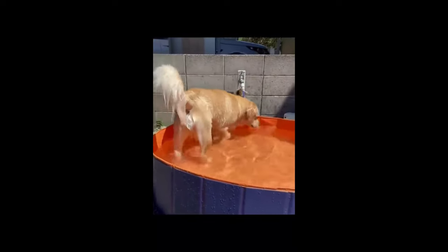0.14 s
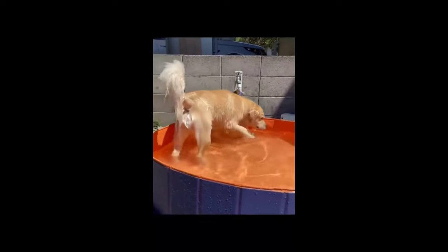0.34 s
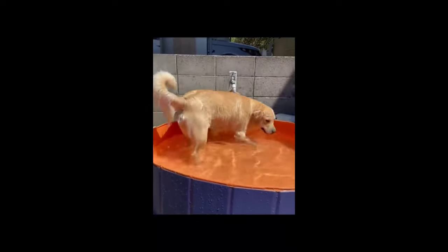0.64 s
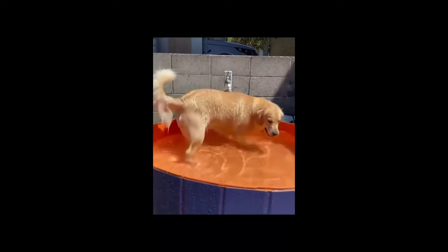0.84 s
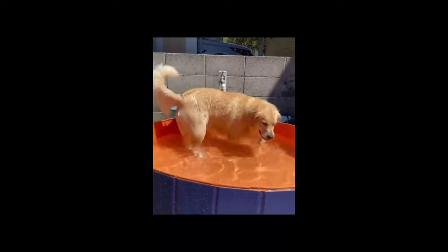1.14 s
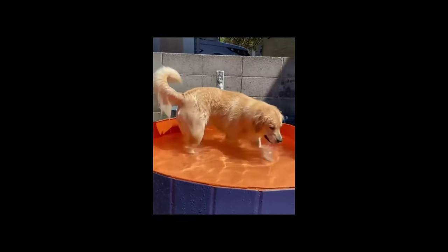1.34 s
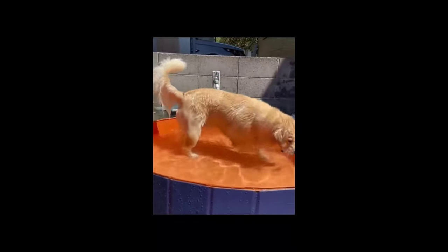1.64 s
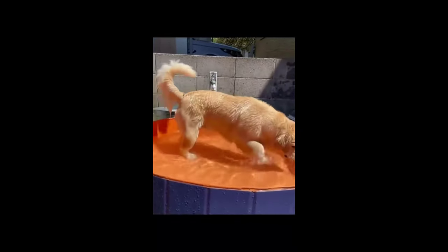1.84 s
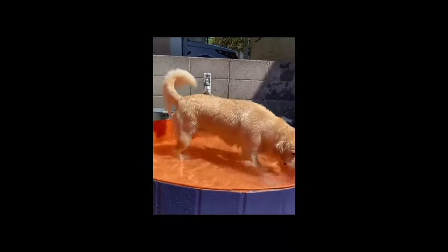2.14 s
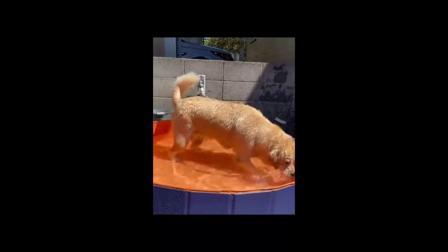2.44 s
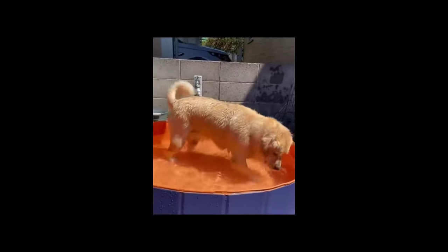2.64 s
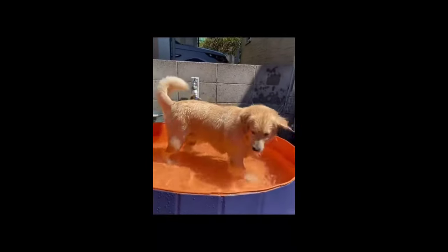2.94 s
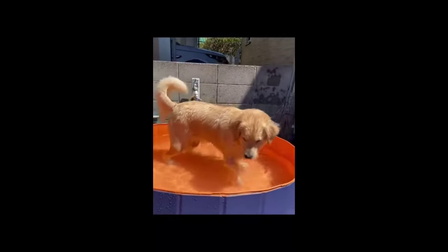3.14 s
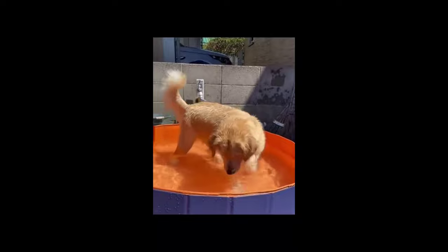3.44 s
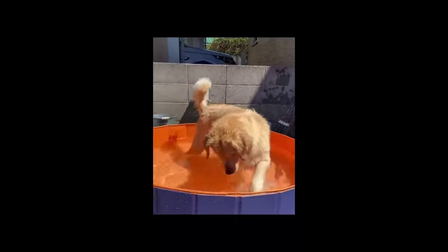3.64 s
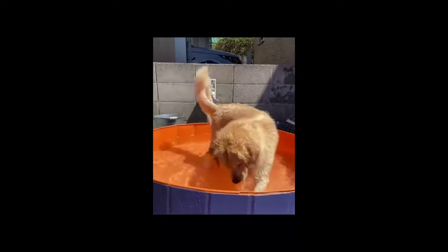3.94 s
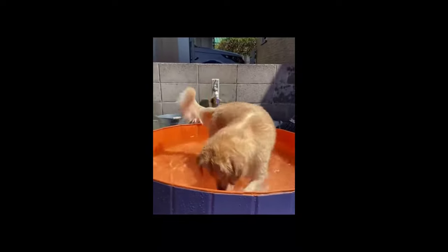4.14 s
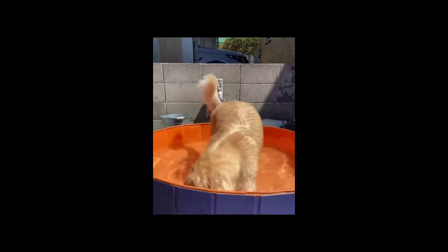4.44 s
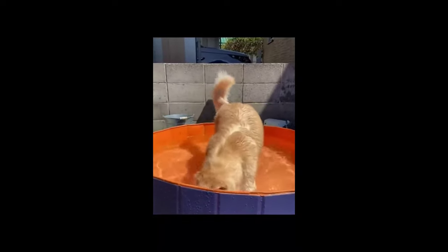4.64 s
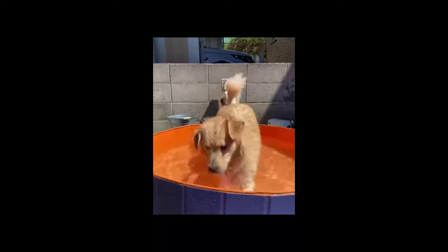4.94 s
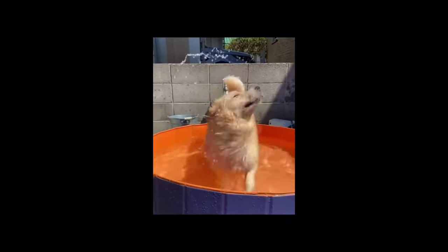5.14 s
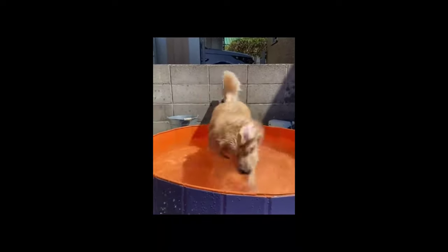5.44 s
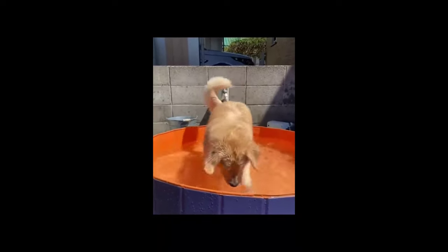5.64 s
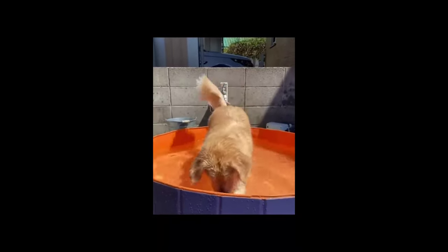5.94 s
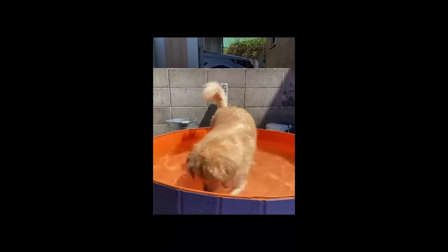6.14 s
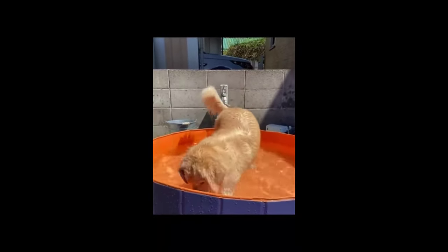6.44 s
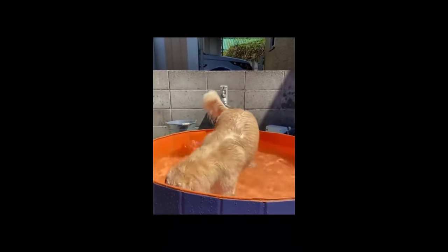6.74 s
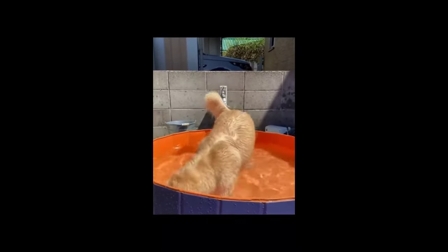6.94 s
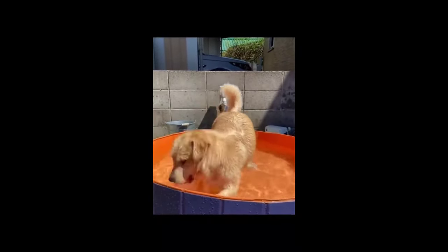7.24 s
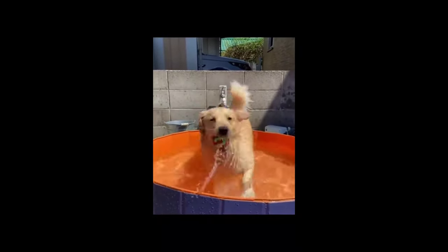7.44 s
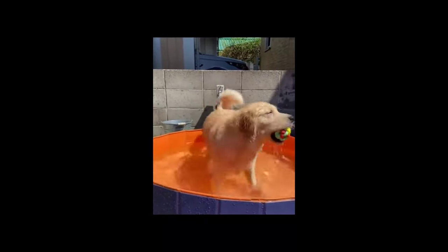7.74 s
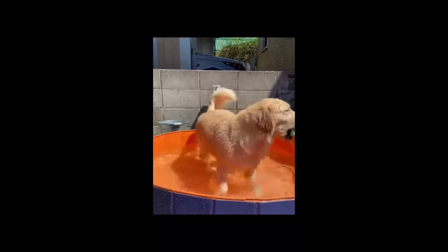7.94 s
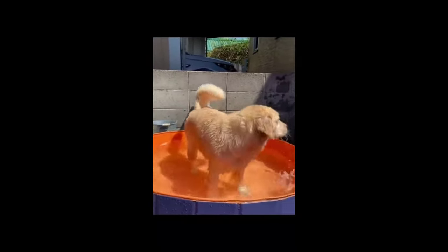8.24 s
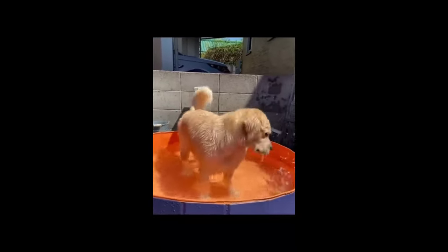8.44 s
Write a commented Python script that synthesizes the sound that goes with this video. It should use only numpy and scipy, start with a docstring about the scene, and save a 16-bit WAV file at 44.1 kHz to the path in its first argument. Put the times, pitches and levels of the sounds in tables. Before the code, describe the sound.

Close, wet pawing and muzzle-dunking in a shallow pool: bubbly sloshing, sharp slaps and dripping spray, with a low far-off engine behind.

```python
"""In a walled backyard, close by, a dog wades, paws and dunks its head in a shallow plastic pool.
Each stroke churns up a cloud of short ringing tones, one per bubble, and throws spray made of tiny rings and noise.
Big air pockets glug and hollows gloop as gliding tones; paws slap and drops fall back as noise bursts with rings.
Far off, traffic rumbles as shaped noise, an engine rises and falls and a hum wavers as slow tones."""
import sys
import numpy as np
from scipy import signal
from scipy.fft import rfft, irfft, next_fast_len
from scipy.io import wavfile
from scipy.ndimage import uniform_filter1d, map_coordinates

SR = 44100
rng = np.random.default_rng(int(sys.argv[2]) if len(sys.argv) > 2 else 0)


def generate_wav(signal):
    """Clip the signal to [-1, 1] and save it as 16-bit WAV at the path in sys.argv[1]."""
    frames = np.transpose(np.atleast_2d(signal))
    scaled = np.clip(frames, -1, 1) * 32767
    pcm = np.round(scaled).astype(np.int16)
    wavfile.write(sys.argv[1], SR, pcm)


N = 378819

# Strokes of paws and muzzle through the water:
# (time of the height [s], churn level [dB], spray level [dB], rise [s], fall [s],
#  tilt towards small bubbles [dB], tilt towards fine spray [dB])
STROKES = [(0.01, -45, -50, 0.063, 0.19, -4.5, -2), (0.09, -51.5, -52, 0.059, 0.076, 14, 13),
           (0.33, -57.5, -57, 0.83, 0.82, -1, 3), (0.492, -43.5, -47.5, 0.12, 0.18, 7.5, -14),
           (0.543, -38, -42.5, 0.071, 0.096, 4.5, -18), (0.764, -44, -48, 0.2, 0.44, -3.5, -1.5),
           (0.894, -40.5, -49.5, 0.061, 0.18, 1.5, -9), (1.08, -57.5, -56, 0.12, 0.44, 5, 3),
           (1.32, -46, -53.5, 0.23, 0.27, 8, -7), (1.394, -49, -42, 0.061, 0.039, 10, -10),
           (1.465, -56, -53.5, 0.13, 0.59, 8, 0), (2.02, -50, -50.5, 0.25, 0.3, 9, -8),
           (2.09, -38, -38.5, 0.013, 0.08, 2, 1.5), (2.569, -51, -54.5, 0.076, 0.15, -1, 2),
           (2.701, -48.5, -51, 0.11, 0.16, -0.5, -1), (2.199, -58, -56, 0.13, 0.24, -3, 1),
           (2.918, -50, -42, 0.039, 0.06, -15, 3), (2.95, -51, -40, 0.094, 0.044, 5, -1),
           (3.28, -54, -53.5, 0.035, 0.13, 7, -13), (3.357, -49, -51, 0.044, 0.33, -10, -1.5),
           (3.539, -45, -55.5, 0.062, 0.088, 2, -26), (3.655, -47, -50, 0.14, 0.48, 11, -12),
           (3.829, -53, -48, 0.059, 0.71, 1, 1.5), (3.936, -38, -34.5, 0.009, 0.034, 8, -2),
           (4.14, -37, -39, 0.065, 0.11, 0.5, -5), (4.253, -35.5, -53, 0.045, 0.11, -5, -26),
           (4.295, -37.5, -37, 0.018, 0.086, 10.5, -2), (4.413, -33.5, -41, 0.063, 0.1, 0.5, -8),
           (4.508, -43.5, -44, 0.046, 0.026, -14, 14), (4.5, -49.5, -54, 0.087, 0.2, -21, 3),
           (4.721, -41, -68, 0.097, 0.11, -10, 0), (4.647, -40, -56.5, 0.029, 0.2, -24, 9),
           (4.781, -46, -55.5, 0.63, 0.15, 5, -10), (4.892, -72, -80, 0.11, 0.22, -16, -2),
           (5.029, -37.5, -48, 0.042, 0.089, 1, 3), (5.101, -71, -48.5, 0.086, 0.27, 9, 2),
           (5.25, -58, -63.5, 0.057, 0.9, 9, 17), (5.421, -40, -43, 0.077, 0.081, -1, 0.5),
           (5.474, -37, -38, 0.0066, 0.044, -14, -1), (5.493, -37.5, -42.5, 0.013, 0.17, -4, 3.5),
           (5.579, -30.5, -48, 0.0087, 0.032, -8, -1), (5.73, -60.5, -63, 1, 0.51, 4, 18.5),
           (5.813, -47.5, -38, 0.005, 0.037, -10, 5.5), (5.992, -37.5, -45, 0.081, 0.16, 1, -6.5),
           (6.027, -39, -39.5, 0.13, 0.14, 1, 0.5), (6.09, -41, -58, .06, 0.12, -5, 2),
           (6.148, -36, -43, 0.0087, .035, 6, -2), (6.169, -30, -38.5, 0.051, 0.073, -2, -6),
           (6.265, -41.5, -53.5, 0.05, 0.15, -12, 0), (6.421, -49.5, -54, 0.33, 0.32, -7, -1),
           (6.485, -44, -54.5, 0.03, 0.1, 0, -3), (6.6, -41.5, -65, 0.11, 0.17, -7, -5),
           (6.675, -51, -49.5, 0.33, 0.31, 3, 1), (7.12, -53, -65.5, 0.11, 0.17, -17, -20),
           (7.174, -54, -70, 0.052, 0.09, -16, -15), (7.33, -40.5, -49.5, 0.009, .04, -1, -11),
           (7.349, -38.5, -41.5, 0.024, 0.13, -4, 3), (7.529, -58.5, -49.5, 0.015, 0.091, 16, -12),
           (7.594, -41.5, -42, 0.13, 0.17, 4.5, 1.5), (7.779, -49, -51.5, 0.14, 0.25, 6.5, 9.5),
           (7.848, -39.5, -35.5, 0.014, .1, 3, 7.5), (7.888, -34.5, -32.5, 0.052, 0.13, 2, 5),
           (7.972, -48, -42.5, 0.053, 0.054, 25, -29), (8.089, -44, -48, .12, 0.19, -7, 3),
           (8.289, -47, -57, 0.17, 0.28, 3.5, 18), (8.326, -50.5, -35, 0.0048, 0.02, 7.5, 7.5),
           (8.336, -44.5, -35, 0.00725, 0.076, 11, -1), (8.433, -46.5, -43, 0.093, 0.17, 6, 1.5)]
STROKE_DEPTH_DB = 20.5  # a stroke climbs this much in its rise time and sinks as much in its fall time
# after each stroke the water settles and thrown drops rain back: (churn, spray)
SETTLE_DB, SETTLE_DB_PER_S = (-19, -23.5), (30, 21.5)
SETTLE_FALL_S = 0.13  # SETTLE_DB holds for a stroke with this fall time; longer strokes throw more water
LAPPING_DB = (-63.5, -88)  # the pool laps all the time: (churn, spray)


def stirring():
    """Each stroke swells, falls and leaves the water settling; louder strokes count more in the tilts."""
    t = np.arange(0, N / SR, .002)
    s, churn_db, spray_db, rise, fall, small_db, fine_db = np.transpose(STROKES)[:, :, None]
    before, after = np.maximum(s - t, 0), np.maximum(t - s, 0)
    swell = gain_of(-STROKE_DEPTH_DB * (before / rise + after / fall))
    more_water = np.sqrt(fall / SETTLE_FALL_S)
    kinds = zip((churn_db, spray_db), (small_db, fine_db), SETTLE_DB, SETTLE_DB_PER_S, LAPPING_DB)
    controls = []
    for peak_db, tilt_db, settle_db, db_per_s, lap_db in kinds:
        settling = (t > s) * more_water * gain_of(settle_db - db_per_s * after)
        power = gain_of(peak_db) ** 2 * (swell ** 2 + settling ** 2)
        total = power.sum(0) + gain_of(lap_db) ** 2
        level_db = 10 * np.log10(total)
        mean_tilt_db = (power * tilt_db).sum(0) / total
        controls += [level_db, mean_tilt_db]
    return curves(np.column_stack([t, *controls]))


# Colour of the bubble cloud: (pitch [Hz], relative level [dB])
CHURN_COLOUR = [(200, -31), (300, -3), (450, 0.5), (700, 2.5), (1100, 0), (1500, -4), (2100, -7),
                (2900, -17.5)]


def churn(level_db, small_db, per_s=1300, plops_db=-3.5, slosh_db=-4.5):
    """Stirred water sloshes and gurgles, denser the harder the stroke; a few plops stand out."""
    crowd = per_s * gain_of(0.84 * (level_db + 45.0))  # bubbles per second
    bubbles = cloud(230, 2734, crowd / 2, cycles=50, spread_db=1.1, glide=6.6, scatter=.15, count=100)
    plops = cloud(520, 2600, crowd / 11, cycles=48, spread_db=1.4, glide=7, scatter=.3, count=60)
    slosh = sheet(patch_db=8, patch_s=.026, patch_hz=140)
    ringing = coloured(bubbles + gain_of(plops_db) * plops, CHURN_COLOUR)
    mix = ringing + gain_of(slosh_db) * coloured(slosh, CHURN_COLOUR)
    return gain_of(level_db) * tilted(evened(mix), small_db, hinge_hz=930)


# Colour of the spray: (pitch [Hz], relative level [dB])
SPRAY_COLOUR = [(500, -23), (1400, -6), (2100, -1), (3200, 1), (5500, -2.5), (8000, -5), (10500, -8),
                (13000, -19)]
CHIME_DB, MIST_DB = -2.5, 0  # ringing droplets and mist against the fizz of tiny bubbles
RIPPLE_DB, RIPPLE_S, RIPPLE_HZ = 2.6, .16, 110  # uneven, shifting colour: depth, lasting, width


def spray(level_db, fine_db, per_s=2400, patter_db=-8):
    """Tiny bubbles, droplets that ring on, the patter of their impacts and a fine mist."""
    crowd = per_s * gain_of(0.37 * (level_db + 52.5))  # droplets per second
    fizz = cloud(1977, 12600, crowd / 1.4, cycles=35, spread_db=1.0, glide=2.2, scatter=.4, count=90)
    chime = cloud(1500, 6800, crowd / 6, cycles=110, spread_db=1.1, glide=2, scatter=.6, count=90)
    patter = evened(impacts(crowd * 0.09, spread_db=1.8) * rng.choice([-1, 1], N))
    shared, apart = (sheet(patch_db=6.5, patch_s=0.022, patch_hz=240) for _ in range(2))
    wide = shared + apart * np.array([[.7], [-.7]])  # left and right partly differ
    mist = wide * crackle(crowd / 8, burst_s=.004, spread_db=1.6, steady=.48)
    mix = fizz + gain_of(CHIME_DB) * chime + gain_of(patter_db) * patter + gain_of(MIST_DB) * mist
    rippled = patchy(mix, RIPPLE_DB, RIPPLE_S, RIPPLE_HZ, size=1024)
    return gain_of(level_db) * tilted(coloured(rippled, SPRAY_COLOUR), fine_db, hinge_hz=5970)


# Large air pockets that stand out:
# (time [s], peak level [dB], starting pitch [Hz], time to fall 60 dB [s], glide [octaves per s])
BIG_BUBBLES = [(0.109, -22, 1025, 0.018, 23), (0.115, -39, 1180, 0.11, 0.5),
               (0.527, -28.5, 238.5, 0.14, -4.5), (0.549, -28, 1950, 0.01, 6),
               (0.583, -30.5, 560, 0.016, 12), (0.635, -39, 1030, 0.11, 11.5), (0.737, -28, 795, 0.026, -2),
               (0.738, -29, 676, 0.1, -14.5), (0.939, -40, 1421, 0.041, 3), (1.114, -41.5, 1627, .06, 2),
               (1.201, -38, 654, 0.056, 15), (1.329, -39, 1850, 0.044, 0), (1.226, -35, 1520, 0.043, 7),
               (1.371, -28.5, 2296, 0.024, 5), (1.435, -38.5, 1560, 0.037, 4),
               (1.437, -40, 1136, 0.077, -3.5), (1.487, -38, 360, 0.1, 3), (1.833, -39.5, 565, 0.068, -2),
               (1.967, -44, 1280, 0.079, -3), (2.012, -38, 2010, 0.014, 6), (2.025, -37, 710, 0.044, 9),
               (2.052, -42, 732, 0.06, -8), (2.076, -36, 1355, 0.094, -3), (2.083, -37.5, 377, 0.1, -7),
               (2.095, -33, 742, 0.072, 9), (2.567, -40, 1040, 0.02, 1), (2.628, -40, 777, 0.086, -2.5),
               (2.667, -44, 1010, 0.04, -4), (2.693, -47, 1750, .025, 6), (2.699, -40, 940, .03, 4),
               (3.326, -42, 1156, .04, 1), (3.349, -29, 1690, 0.037, 0), (3.376, -38, 663, 0.12, -7.5),
               (3.401, -31.5, 565, 0.022, 10), (3.432, -39, 393, 0.14, -3.5), (3.463, -40, 395, 0.078, 4.5),
               (3.508, -45, 1150, 0.12, -1), (3.545, -38, 600, 0.03, 1), (3.641, -38.5, 920, 0.092, -3),
               (3.654, -37, 1520, 0.038, 4), (3.725, -41, 1700, .03, -5), (3.823, -32.5, 1237, 0.017, 4),
               (3.824, -36.5, 1750, 0.034, 5), (4.042, -34, 653, 0.14, 15), (4.075, -29, 743, 0.051, -5),
               (4.081, -26.5, 943, 0.074, 11.5), (4.114, -21, 680, 0.083, 2), (4.142, -29, 246, 0.031, 0),
               (4.286, -31, 1010, .04, -2), (4.292, -34.5, 348, 0.11, 3), (4.328, -38, 1165, .06, 1.5),
               (4.381, -38, 1860, .035, 5.5), (4.412, -21.5, 350, 0.034, -0.5),
               (4.418, -30.5, 1148, 0.15, 1), (4.426, -35, 360, 0.15, 5.5), (4.466, -31.5, 1630, 0.058, 23),
               (4.549, -34, 734, 0.026, 6), (4.628, -25.5, 544, 0.093, 5), (4.634, -27.5, 816, 0.086, 1.5),
               (4.644, -21, 1060, 0.063, 7.5), (4.661, -38, 444, 0.22, -11),
               (4.666, -28.5, 264, 0.09, -7.5), (4.71, -23.5, 814, 0.064, -8), (4.695, -46, 1460, .04, 14),
               (4.767, -33, 1060, 0.073, 8.5), (4.778, -32.5, 1280, 0.058, 18.5),
               (5.098, -41, 1636, 0.025, 1), (5.206, -42.5, 2250, 0.061, -1), (5.269, -45, 1790, 0.036, 1),
               (5.398, -33, 900, .02, 11), (5.405, -33, 880, 0.05, 23), (5.496, -34, 1787, .018, 4),
               (5.521, -31, 1470, 0.015, 4), (5.958, -29, 720, 0.041, 13), (5.972, -32, 1140, 0.05, 9),
               (5.995, -35, 1030, 0.065, 1.5), (5.985, -29, 761, 0.065, 11), (6.008, -31, 930, 0.1, -2),
               (6.033, -35.5, 2560, .07, -3), (6.022, -23, 660, 0.018, 4), (6.149, -34, 685, 0.11, -6),
               (6.156, -27, 293, 0.077, -18.5), (6.158, -24, 920, 0.068, -6.5),
               (6.172, -26.5, 398, 0.014, -17), (6.07, -34, 760, 0.044, 12), (6.255, -32, 303, 0.027, 15),
               (6.33, -42, 780, 0.059, 1), (6.475, -36.5, 496, 0.058, 16), (6.477, -36, 880, 0.026, 8),
               (6.472, -42.5, 1820, 0.04, 7), (6.552, -35.5, 776, 0.056, -3.5),
               (6.591, -29.5, 1000, 0.079, -5.5), (6.6, -45, 2290, 0.041, 6), (6.622, -36, 980, .05, 11),
               (6.643, -42, 1630, 0.027, 1), (6.679, -42, 2340, .04, 3), (6.842, -36.5, 856, 0.071, 9.5),
               (7.105, -49, 595, 0.06, 0), (7.172, -42, 890, .06, -5), (7.322, -37.5, 560, 0.03, 15),
               (7.342, -34, 205, 0.16, -1), (7.348, -34, 274, 0.098, -13.5), (7.361, -36.5, 1860, 0.049, 2),
               (7.545, -35, 2360, 0.037, 1), (7.569, -36.5, 574, 0.13, 4.5), (7.589, -27.5, 1733, 0.038, 0),
               (7.686, -41, 1370, 0.028, 6), (7.72, -38.5, 1130, .035, -1.5), (7.818, -37, 1920, .025, 0),
               (7.594, -33, 2070, .03, 9), (7.626, -34, 577, 0.032, 7), (7.637, -26, 643, 0.069, 2),
               (7.779, -38, 1100, 0.024, 1), (7.783, -39, 1760, 0.034, 4), (7.85, -38, 1485, .025, 4),
               (7.8895, -24.5, 700, 0.06, 9), (7.909, -26.5, 700, 0.023, 5), (7.961, -36, 1780, 0.044, -1),
               (7.96, -34, 1100, 0.036, 15), (8.027, -39.5, 1550, 0.049, 6), (8.073, -46, 890, 0.036, 3),
               (8.097, -40.5, 1940, .03, -1), (8.1, -45, 725, 0.04, 10), (8.335, -32, 1540, 0.025, 23)]


def glugs():
    """Each large air pocket rings with its own pitch, fading and gliding up or down."""
    out = np.zeros(N)
    for s, db, hz, t60, glide in BIG_BUBBLES:
        add(out, s, gain_of(db) * bubble(hz, t60, glide))
    return out


# Paws slapping the surface: (time [s], peak level of the air ring [dB], settled pitch of the trapped air [Hz],
#  starting pitch [multiples of the settled pitch], crack level at its start [dB])
PAW_SLAPS = [(0.530, -22, 1050, 3, -34), (2.0839, -33, 1350, 2, -33), (3.930, -15, 1760, 2.5, -28),
             (4.1352, -14.5, 700, 2.2, -40), (4.4148, -19, 750, 1.8, -36), (5.4235, -27.5, 2030, 1.5, -42),
             (5.492, -31, 1300, 2, -31), (5.539, -34, 1440, 2, -34), (5.5779, -7, 727, 7.5, -14.5),
             (6.1618, -31, 479, 2, -40), (6.1678, -18, 560, 2, -38), (7.35, -30, 1806, 1.5, -54),
             (7.8755, -24, 686, 2, -38), (7.8807, -41, 1000, 3, -30)]
OPENING_S = .00024  # how fast the air pocket under the paw opens


def slaps(cycles=7.5, crack_s=0.00057, crack_hz=3500):
    """A sharp crack of noise; the air pocket under the paw opens, so its pitch drops very quickly."""
    out, t = np.zeros(N), np.arange(1000) / SR
    band = signal.butter(1, [crack_hz / 2, min(crack_hz * 2, SR / 3)], "bandpass", fs=SR)
    for s, db, hz, first, crack_db in PAW_SLAPS:
        crack = evened(signal.lfilter(*band, rng.standard_normal(len(t)))) * np.exp(-t / crack_s)
        pitch = hz * (1 + (first - 1) * np.exp(-t / OPENING_S))
        turns = np.cumsum(pitch) / SR
        swing = (1 - np.exp(-2 * turns)) * gain_of(-60 * t * hz / cycles)  # falls 60 dB in this many cycles
        ring = swing / swing.max() * np.sin(2 * np.pi * turns)
        add(out, s, gain_of(crack_db) * crack + gain_of(db) * ring)
    return out


# Hollows behind a moving leg, whose pitch climbs as they close: (start [s], length [s],
#  level before swell, sag and gurgle [dB], first pitch [Hz], last pitch [Hz], gurgle [0-1])
HOLLOWS = [(0.054, 0.077, -44.5, 594, 1300, 0.73), (1.388, 0.1, -32, 199, 657, 0),
           (1.86, 0.034, -35.5, 537, 743, 0.9), (3.48, 0.03, -44, 490, 880, 1),
           (3.541, 0.0546, -43, 589, 1000, 1), (5.926, 0.07, -38, 593, 960, 0.84)]
GURGLE_DB, GURGLE_SHARE = 2.8, .045  # waver of a full gurgle: in level, and in pitch as a share


def gloops(bend=2.1, sag_db=-4, ends=0.26):
    """A shrinking hollow keeps ringing, its pitch rising ever faster; trembling walls make it gurgle."""
    out, flutter, tremble = np.zeros(N), drift(250, size=100), drift(150, size=150)
    for s, length, db, first_hz, last_hz, gurgle in HOLLOWS:
        u = np.linspace(0, 1, int(length * SR))  # how far the hollow has closed
        now = int(s * SR) + np.arange(len(u))
        climb = first_hz * (last_hz / first_hz) ** (u ** bend)
        hz = climb * (1 + gurgle * GURGLE_SHARE * tremble[now])
        swell = (4 * u * (1 - u)) ** abs(ends)  # soft start and end
        level = gain_of(db + sag_db * u + gurgle * GURGLE_DB * flutter[now])
        add(out, s, level * swell * np.sin(2 * np.pi * np.cumsum(hz) / SR))
    return out


# Largest drops falling back:
# (time [s], level before the ring and splat trims [dB], starting pitch [Hz], splat against that level [dB])
BIG_DROPS = [(0.1, -41, 3570, -10), (0.144, -35, 3740, -11), (0.1838, -41, 4750, -3),
             (0.197, -42.5, 2480, 10), (0.336, -39, 5530, -22), (0.382, -47, 4450, 6),
             (0.53, -26, 4870, -21), (0.55, -28, 3000, -10), (0.823, -31, 2740, -8),
             (0.8906, -30.5, 5670, 0), (0.902, -35, 2520, -19), (0.963, -33.5, 2940, -14),
             (1.0794, -39, 2860, -19), (1.188, -38, 5660, -1.5), (1.397, -31, 2630, -2.5),
             (1.457, -39.5, 2700, 3), (1.567, -38, 2150, -20), (1.656, -38, 1940, -7),
             (1.784, -56.5, 5370, 9.5), (1.945, -36.5, 3100, -7), (2.01, -35, 3200, -15),
             (2.089, -25.5, 4130, -19), (2.177, -36.5, 3460, -16), (2.369, -57, 6000, 9),
             (2.424, -42.5, 4670, -3), (2.856, -48, 3280, -10), (2.941, -32, 2993, -21),
             (3.044, -40, 5700, -18), (3.264, -46, 3320, -12), (3.353, -39, 3600, 1.5),
             (3.621, -31.5, 3720, -35), (3.915, -34.5, 2433, -5), (4.298, -31.5, 5290, -14),
             (4.315, -29.5, 3380, -7), (4.394, -29, 5370, -16), (4.5, -39, 2710, -10),
             (4.593, -49, 5000, 8.5), (5.091, -37, 6230, -6), (5.183, -38, 4020, -22),
             (5.1904, -45, 11300, -1), (5.378, -35.5, 3000, -14), (5.424, -38, 2900, -16),
             (5.47, -36, 5330, -7), (5.494, -27.5, 2450, -14), (5.794, -43, 5100, -4.5),
             (5.812, -27.5, 5500, -9.5), (5.82, -33, 5250, -10), (6.1533, -41, 2100, -5),
             (6.329, -39, 3720, -4), (6.484, -51, 3980, 6), (6.836, -39, 2120, -3.5),
             (6.982, -50, 3974, -3), (7.002, -50, 3523, 1), (7.199, -46, 3350, -8),
             (7.5183, -37.5, 2600, -12), (7.698, -47, 5070, 7), (7.809, -31.5, 3325, -15),
             (7.8395, -42, 2435, -2), (7.8802, -20.5, 3830, -9), (7.889, -26, 4478, -12),
             (7.926, -32, 5835, -9), (7.939, -38, 5500, 7.5), (7.974, -33, 5130, -5), (8.067, -41, 5550, 2),
             (8.327, -22.5, 5530, 0.5), (8.435, -33, 2530, -4)]


def drops(cycles=35, tick_s=0.0048, ring_db=-1, snap_s=0.00035, snap_db=1, splat_trim_db=-4, splat_low_hz=2200):
    """Each drop snaps on the surface with a bright splat, and leaves a small ringing bubble."""
    out, t = np.zeros(N), np.arange(1000) / SR
    impact = gain_of(splat_trim_db) * np.exp(-t / tick_s) + gain_of(snap_db) * np.exp(-t / snap_s)
    thin = signal.butter(1, min(splat_low_hz, SR / 3), "highpass", fs=SR)
    for s, db, hz, splat_db in BIG_DROPS:
        splat = signal.lfilter(*thin, rng.standard_normal(len(t)) * impact)
        add(out, s, gain_of(db + splat_db) * splat)
        add(out, s, gain_of(db + ring_db) * bubble(hz, cycles / hz, 4.3))
    return out


# Steps that go to the bottom of the pool:
# (time of the height [s], level [dB], time from the height to 1/e [s])
DEEP_STEPS = [(4.433, -35, 0.022), (4.558, -42, 0.029), (7.364, -37.5, 0.054), (7.865, -49, 0.11),
              (8.017, -62, 0.025), (8.236, -66, 0.028)]


def plunge(level_db, push_db=-52.5, follow=2):
    """A leg driven deep shoves the water with a low, soft rush of noise; deep steps add a lower heave."""
    rush = coloured(rng.standard_normal(N), [(40, -53), (110, -35), (230, 8.0), (350, 11.5), (600, -35), (2000, -68)])
    heave_colour = [(50, -23), (110, 1.5), (170, 2.0), (260, 1), (380, -10.0), (800, -51), (2000, -70)]
    heave = coloured(rng.standard_normal(N), heave_colour)
    t = np.arange(N) / SR
    steps = sum(gain_of(db) * np.exp(-((t - s) / half) ** 2) for s, db, half in DEEP_STEPS)
    rush_level = gain_of(push_db + follow * (level_db + 38.0))  # grows faster than the churn
    return rush_level * rush + steps * heave


# Echoes from the pool rim and the wall: (delay [s], gain [factor, minus turns the wave over])
NEAR_ECHOES = [(0.0031, -0.0058), (0.0052, -0.086), (0.009, 0.013), (0.0184, 0.0045)]
# Ring of the yard: (pitch [Hz], time to fall 60 dB [s])
YARD_RING = [(200, 0.24), (1000, 0.068), (4000, 0.082), (12000, 0.033)]
BASS_HZ = 650  # below this the tail is the same on both sides


def yard(x, wet_db=-13, dull_hz=3000):
    """Dull near echoes and a short, diffuse tail from the walls."""
    near, dull = x.copy(), signal.lfilter(*signal.butter(1, dull_hz, fs=SR), x)
    for delay, gain in NEAR_ECHOES:
        lag = max(round(delay * SR), 1)
        near[:, lag:] += gain * dull[:, :-lag]
    taps = rng.choice([-1., 1.], (2, 16384)) * (rng.random((2, 16384)) < .06)  # sparse random echoes
    hz, t, z = signal.stft(taps, SR, nperseg=256)
    decay = gain_of(-60 * t / read(YARD_RING, hz)[:, None]) * np.minimum(t / .006, 1)
    z[1, hz < BASS_HZ] = z[0, hz < BASS_HZ]  # long waves reach both microphone ports alike
    tail = signal.istft(z * decay, SR, nperseg=256)[1]
    tail = tail / np.linalg.norm(tail[0])
    return near + gain_of(wet_db) * signal.fftconvolve(x, tail, axes=1)[:, :N]


# Colour of the distant traffic rumble: (pitch [Hz], relative level [dB])
RUMBLE_COLOUR = [(15, -52), (30, -54), (48, 4), (75, 3), (130, -7.5), (240, -8), (350, -10.5), (470, -22.5),
                 (800, -22.5), (2000, -49.5), (3200, -56), (5500, -65.5), (13000, -55.5)]
# Colour of the drone of tyres and engines: (pitch [Hz], relative level [dB])
DRONE_COLOUR = [(50, 1.5), (90, -19), (140, 13), (175, -5.5), (230, -1.5), (330, -32), (800, -77)]
# Levels of the street over time: (time [s], rumble level [dB], drone level before its lumps [dB])
STREET_LEVELS = [(0, -48.5, -60), (1.2, -46.5, -55.5), (2.4, -48, -54.5), (3.15, -47.5, -63), (3.5, -48, -56.5),
                 (4.5, -44, -58), (5.5, -44.5, -48.5), (6.5, -44, -52.5), (7.3, -45, -52), (7.9, -45, -43.5),
                 (8.6, -45.5, -54)]
# A far engine: (time [s], firing rate [Hz], level [dB])
FAR_ENGINE = [(0, 65, -81), (0.9, 63.8, -51.5), (1.75, 54.8, -47.5), (2.45, 59.2, -65), (2.75, 59.5, -39.5),
              (3.1, 61.8, -42.5), (3.3, 65.34, -47), (4.2, 69.46, -54), (4.95, 64.43, -37),
              (5.1, 63.8, -28), (5.35, 60.2, -40.5), (5.8, 61.96, -45), (6.5, 61.54, -41.5),
              (7.0, 62.8, -49.5), (8.6, 61.5, -50.5)]
# Steady machine hum: (pitch [Hz], level [dB])
MACHINE_HUM = [(61.5, -76), (97.3, -53.5), (119, -60)]


def street(waver=0.31, lumps_db=3):
    """Uneven traffic rumble and drone, one engine changing speed, and a wavering hum."""
    apart = signal.lfilter(*signal.butter(2, 2000, "highpass", fs=SR), rng.standard_normal((2, N)))
    rumble = coloured(rng.standard_normal(N) + 3.5 * apart, RUMBLE_COLOUR)  # mainly the treble differs by side
    rumble_db, drone_db = curves(STREET_LEVELS)
    drone = coloured(rng.standard_normal(N), DRONE_COLOUR) * gain_of(lumps_db * drift(12))
    traffic = gain_of(rumble_db) * rumble + gain_of(drone_db) * drone
    hz, db = curves(FAR_ENGINE)
    throb = np.sin(2 * np.pi * np.cumsum(hz) / SR) * (1 + waver * drift(10))
    engine = gain_of(db) * evened(throb)
    t = np.arange(N) / SR
    hum = np.zeros(N)
    for f, hum_db in MACHINE_HUM:
        tone = np.sin(2 * np.pi * f * t + 0.54 * drift(3))
        hum += gain_of(hum_db) * evened(tone * (1 + waver * drift(2.99)))
    return traffic + engine + hum


def bubble(hz, t60, glide):
    """An air pocket swings up within a few cycles and dies away while its pitch glides."""
    t = np.arange(int(max(t60, .002) * SR) + 64) / SR
    swing = (1 - np.exp(-t * hz)) ** 2 * gain_of(-60 * t / t60)
    pitch = hz * 2 ** (glide * t)
    return swing / swing.max() * np.sin(2 * np.pi * np.cumsum(pitch) / SR)


def cloud(low_hz, high_hz, per_s, cycles, spread_db, glide, scatter, count):
    """Bubbles of many pitches, each born at a random moment with its own balance of left and right."""
    births, kind, out = impacts(per_s, spread_db), rng.integers(0, count, N), np.zeros((2, N + SR))
    born = np.flatnonzero(births)
    lean = scatter * rng.uniform(-1.1, 1, N)[born, None] * [1, -1]
    sizes = births[born, None] * (1 + lean)
    rings = []
    for hz in np.geomspace(low_hz, high_hz, count):
        pitch = hz * rng.uniform(.98, 1.02)
        t60 = cycles * rng.uniform(.5, 1.5) / hz
        ring = bubble(pitch, t60, glide * rng.uniform(-.4, 1.4))
        rings.append(ring * np.sqrt(hz) / np.linalg.norm(ring))
    for at, size in zip(born, sizes):
        ring = rings[kind[at]]
        out[:, at:at + len(ring)] += size[:, None] * ring
    return evened(out[:, :N])


def impacts(per_s, spread_db):
    """Random clicks, many small and a few large, of constant mean power at any rate."""
    size = gain_of(spread_db * np.minimum(rng.exponential(1, N), 4))
    return (rng.random(N) < per_s / SR) * size / np.sqrt(per_s)


def crackle(per_s, burst_s, spread_db, steady):
    """Level of a mist that arrives as separate droplet bursts over a thin steady part."""
    hits = impacts(per_s, spread_db) ** 2
    power = signal.lfilter([1], [1, -np.exp(-1 / (burst_s * SR))], hits)
    return np.sqrt(steady + (1 - steady) * power / power.mean())


def sheet(patch_db, patch_s, patch_hz):
    """A tearing sheet of water: a rush of noise with brief louder and softer patches."""
    return patchy(rng.standard_normal(N), patch_db, patch_s, patch_hz)


PATCH_LIMIT = 1.9  # the brightest patches stay within this many times the typical lift


def patchy(x, patch_db, patch_s, patch_hz, size=512):
    """Lifts and lowers random patches of time and pitch, none far above the rest."""
    frames = dict(nperseg=size, noverlap=size - size // 4)
    hz, t, z = signal.stft(x, SR, **frames)
    cells = rng.standard_normal((256, 2048))
    where = np.meshgrid(hz / patch_hz, t / patch_s, indexing="ij")
    smooth = evened(map_coordinates(cells, where, order=1, mode="wrap"))
    patches = np.minimum(smooth, PATCH_LIMIT)
    return evened(signal.istft(z * gain_of(patch_db * patches), SR, **frames)[1][..., :N])


def tilted(x, tilt_db, hinge_hz):
    """Raises the part above the hinge by the tilt and lowers the part below by half of it."""
    low = signal.sosfiltfilt(signal.butter(1, min(hinge_hz, SR / 3), fs=SR, output="sos"), x)
    return low * gain_of(-tilt_db / 2) + (x - low) * gain_of(tilt_db)


def coloured(x, spectrum):
    """Gives x a spectrum, at unit rms."""
    size = next_fast_len(N)
    gain = gain_of(read(spectrum, np.fft.rfftfreq(size, 1 / SR)))
    return evened(irfft(rfft(x, size) * gain, size)[..., :N])


def drift(per_s, size=2500):
    """Smooth random wander of unit rms, with per_s new targets a second."""
    knots = rng.standard_normal(4096)
    path = np.interp(np.arange(N) / SR * per_s, np.arange(len(knots)), knots)
    return evened(uniform_filter1d(path, size=size))


def gain_of(db):
    """Decibels to amplitude."""
    return 10 ** (np.asarray(db) / 20)


def evened(x):
    """Scales to unit rms."""
    return x / np.sqrt(np.mean(x ** 2) + 1e-20)


def read(points, hz):
    """Reads a spectrum table on a log-frequency axis."""
    f, value = np.transpose(points)
    return np.interp(np.log(hz + 1), np.log(f + 1), value)


def curves(rows):
    """Joins the rows of a time table by straight lines, one curve a column."""
    s, *columns = np.transpose(rows)
    return [np.interp(np.arange(N) / SR, s, c) for c in columns]


def add(mix, s, sound):
    """Mixes a sound in at time s."""
    part = mix[max(round(s * SR), 0):][:len(sound)]
    part += sound[:len(part)]


CLUMP_DB = (2, 2)  # water comes in uneven clumps: (churn, spray)


def scene():
    """All the water sounds in the yard, over the street."""
    churn_db, small_db, spray_db, fine_db = stirring()
    clumps = drift(30)
    churn_db, spray_db = churn_db + CLUMP_DB[0] * clumps, spray_db + CLUMP_DB[1] * clumps
    stirred = churn(churn_db, small_db) + plunge(churn_db) + spray(spray_db, fine_db)
    water = stirred + glugs() + gloops() + slaps() + drops()
    return yard(water) + street()


# Phase difference between left and right: (pitch [Hz], phase by which left leads [radians])
PORT_PHASE = [(0, 0), (130, 0), (500, -.55), (1200, -.45), (1500, 0), (2200, .1), (3000, 1.5), (4300, .8),
              (5500, .1), (7000, 3.1), (8800, 3.2), (10000, 6.2), (12100, 6.4), (13000, 9.2)]
# Balance between the two ports: (pitch [Hz], left minus right [dB])
PORT_BALANCE = [(0, 0), (100, 0), (330, 1.9), (700, -.8), (1200, -3.2), (1800, 0), (2700, -2.5),
                (3900, 2.3), (5000, 0)]
LOW_CUT_HZ, EDGE_HZ = 36, 13150  # lowest and highest pitches let through


def record(dry):
    """The two ports differ in phase and level by frequency; then the band limits."""
    size = next_fast_len(N + 4096)
    hz = np.fft.rfftfreq(size, 1 / SR)
    # each port takes half of the difference, in opposite directions
    port = gain_of(read(PORT_BALANCE, hz) / 2) * np.exp(1j * read(PORT_PHASE, hz) / 2)
    low_cut = hz ** 4 / np.sqrt(hz ** 8 + LOW_CUT_HZ ** 8)
    heard = irfft(rfft(dry, size) * low_cut * np.array([port, 1 / port]), size)[:, :N]
    high_cut = signal.firwin(255, EDGE_HZ, window=("kaiser", 8), fs=SR)
    return signal.oaconvolve(heard, high_cut[None], "same")


dry = scene()
out = record(dry)
generate_wav(out)
```